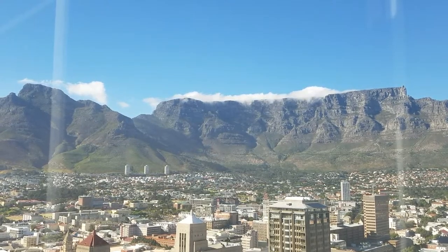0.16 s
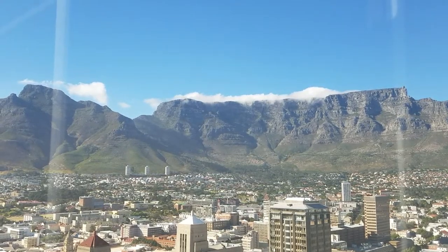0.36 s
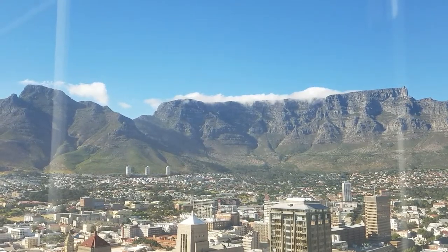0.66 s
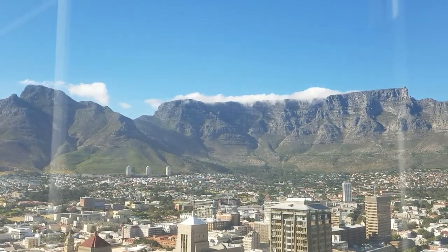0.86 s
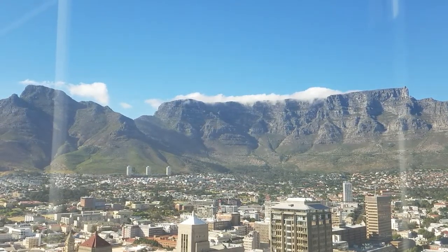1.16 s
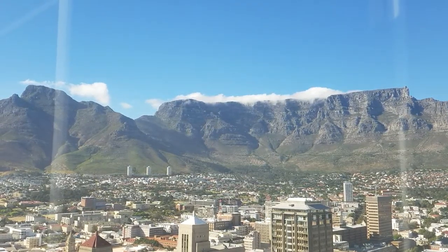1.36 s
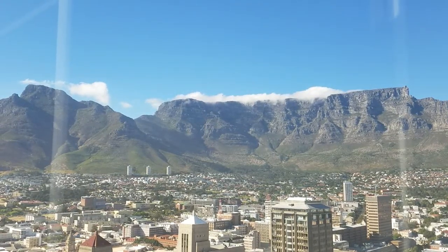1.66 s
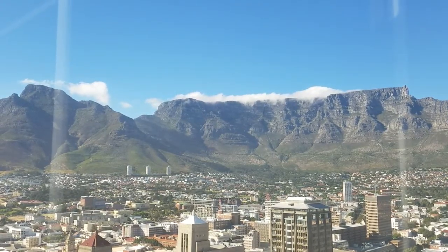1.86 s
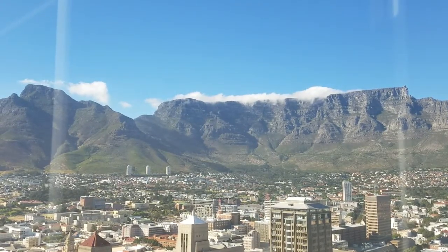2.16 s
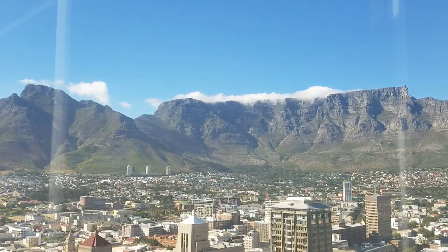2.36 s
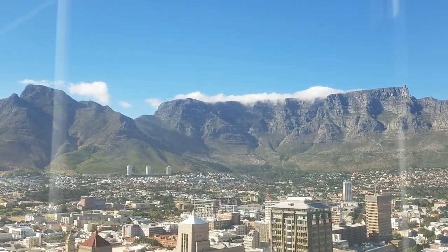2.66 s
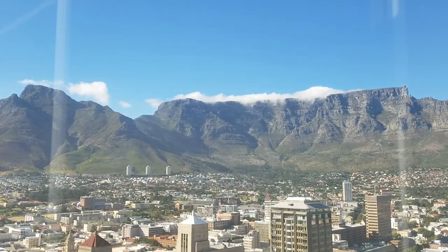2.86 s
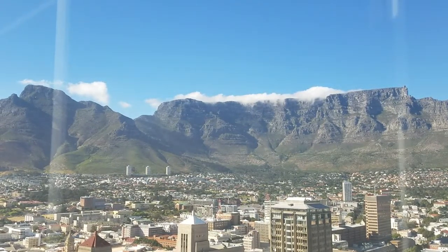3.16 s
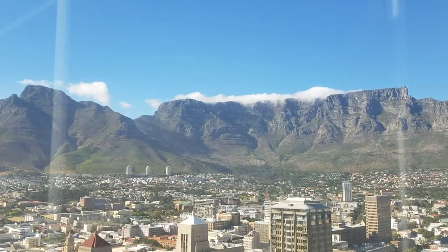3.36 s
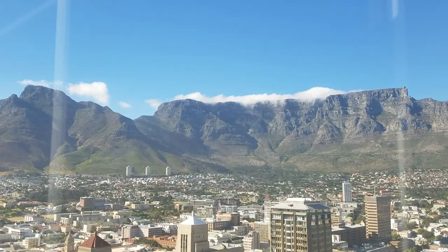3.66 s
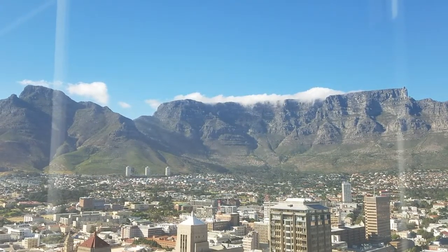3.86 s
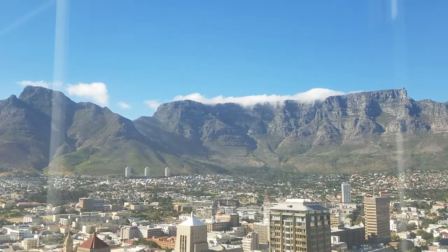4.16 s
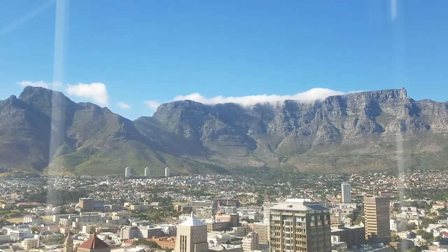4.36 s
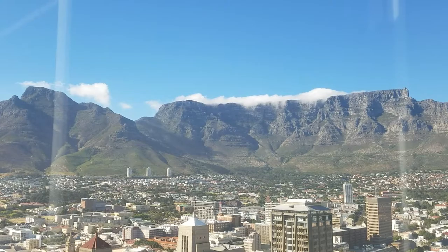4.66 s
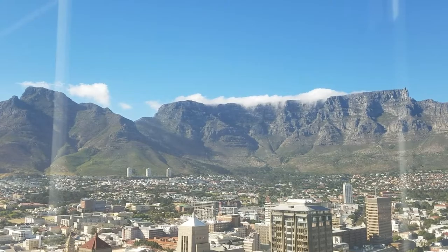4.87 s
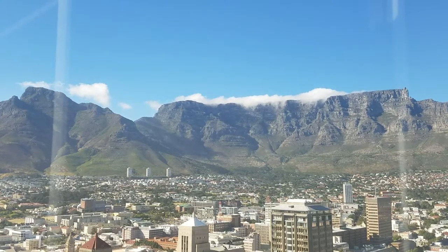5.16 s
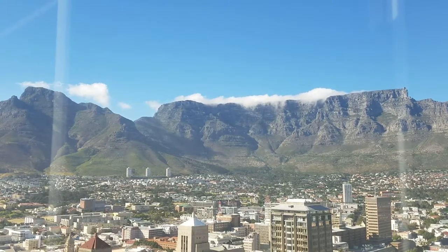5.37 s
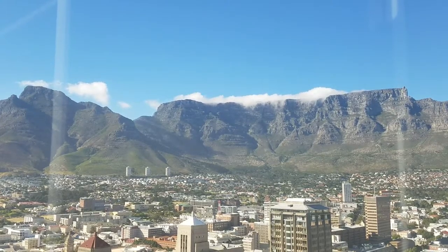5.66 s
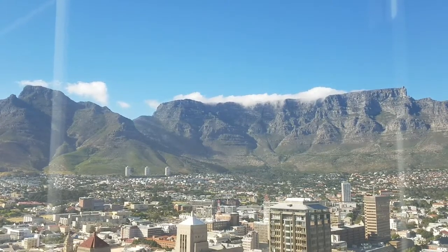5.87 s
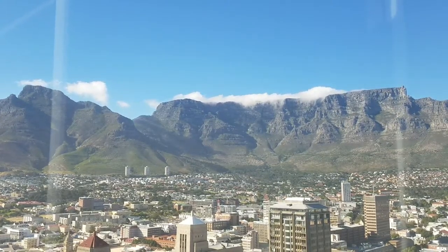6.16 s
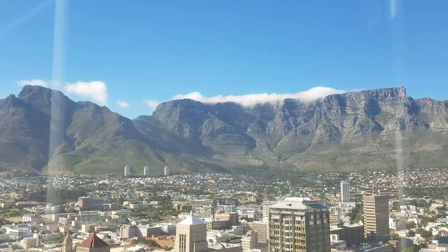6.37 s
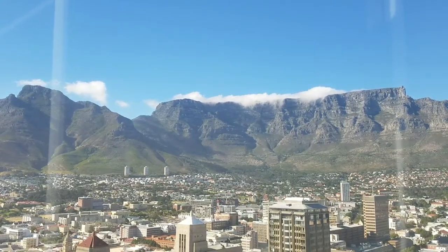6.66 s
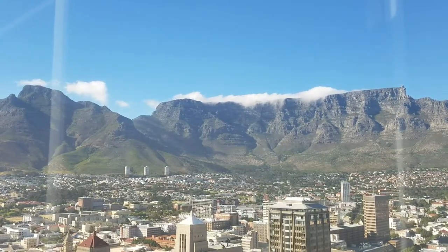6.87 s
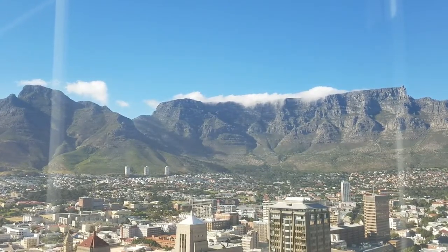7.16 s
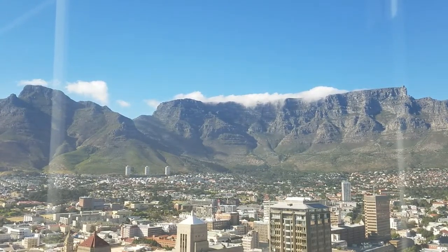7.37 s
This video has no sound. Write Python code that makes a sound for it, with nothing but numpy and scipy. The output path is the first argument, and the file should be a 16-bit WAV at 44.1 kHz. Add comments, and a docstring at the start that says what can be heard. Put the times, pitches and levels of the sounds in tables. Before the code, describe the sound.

Continuous low ventilation drone heard inside a tower room, no city detail. Rumbling air wavers slowly, two fans hum together, one fluttering, and vents rush gently. The hollow moan disappears midway; barely audible breathy whistles come and go. Late, a small hard tick with a quick bounce, a thin whistle, then slightly stronger hiss and a climbing low motor drone. The bass is centred, the upper air wide.

```python
"""A quiet room high in a tower, under a steady ventilation drone.
From the start, noise booms through duct resonances and moans higher up, two fans hum a third apart,
motors add a crowd of faint wavering tones and shaped noise rushes from the vents.
The moan fades midway and faint breathy whistles come and go. Near the end two quick contacts tick,
a thin whistle sets in, then the hiss steps up and a low engine drone rises."""
import sys
import numpy as np
from scipy import signal
from scipy.fft import rfft, irfft, next_fast_len
from scipy.io import wavfile
from scipy.ndimage import uniform_filter1d

SR = 44100
rng = np.random.default_rng(int(sys.argv[2]) if len(sys.argv) > 2 else 0)


def transcribe(signal):
    """Save signal, clipped to [-1, 1], as a 16-bit WAV file at the path in sys.argv[1]."""
    frames = np.atleast_2d(signal).T
    limited = np.clip(frames, -1, 1)
    pcm = np.round(limited * 32767).astype(np.int16)
    wavfile.write(sys.argv[1], SR, pcm)


N = 331448
T = np.arange(N) / SR
BINS_HZ = np.maximum(np.fft.rfftfreq(next_fast_len(N), 1 / SR), 1)


def from_db(db):
    """Decibels to gain."""
    return 10 ** (np.asarray(db) / 20)


def rms_one(x):
    """Scale to unit power."""
    return x / np.sqrt(np.mean(np.abs(x) ** 2) + 1e-30)


def in_time(rows):
    """Each column of a curve at every sample."""
    seconds, *columns = np.transpose(rows)
    return [np.interp(T, seconds, column) for column in columns]


def over_hz(points):
    """A spectrum at every frequency, joined on a log axis and held flat beyond its ends."""
    hz, value = np.transpose(points)
    return np.interp(np.log(BINS_HZ), np.log(hz), value)


def panned(db):
    """Left and right gains for a left-minus-right level difference."""
    return from_db(np.array([[.5], [-.5]]) * db)


def wander(corner_hz):
    """Low-passed complex noise of unit power: it shifts both the level and the phase of a tone."""
    step = 100   # samples per slow point
    pole = np.exp(-2 * np.pi * corner_hz * step / SR)
    noise = rng.standard_normal((N // step + 1002, 2)) @ [1, 1j]
    slow = signal.lfilter([1], [1, -2 * pole, pole * pole], noise)[1000:]   # drop the filter's start
    return np.interp(np.arange(N) / step, np.arange(len(slow)), rms_one(slow))


def tone(hz, lead, waver, rate):
    """A stereo tone of unit power, part steady and part wavering; the left leads by some radians."""
    swing = rms_one(1 + waver * wander(rate))
    spin = swing * np.exp(2j * np.pi * np.cumsum(hz + np.zeros(N)) / SR)
    return np.sqrt(2) * np.real(spin * np.exp(1j * lead * np.array([[.5], [-.5]])))


# Stereo width of the air noise. Each row: frequency in Hz, side level against mid in dB.
AIR_WIDTH = [(60, -27), (110, -27), (175, -18), (220, -12), (350, -9.5), (550, -8), (660, -3.7),
             (830, -4.5), (1050, 1.8), (1800, 1.2), (2600, 0)]
# Stereo balance of the air noise. Each row: frequency in Hz, left minus right in dB.
AIR_BALANCE = [(60, -0.2), (150, 0.1), (300, 4), (700, -1), (1200, 1.5), (1800, -1.1), (4200, -1.1),
               (6400, -2.5), (9800, 1.2), (15000, 0.5)]


def air(gain):
    """Diffuse stereo noise of the given amplitude per root Hz; the bass is nearly alike on both sides."""
    size = next_fast_len(N)
    mid, side = rfft(rng.standard_normal((2, size)))
    width = from_db(over_hz(AIR_WIDTH))
    both = (mid + width * side * [[1], [-1]]) / np.sqrt(1 + width ** 2)
    return irfft(both * gain * panned(over_hz(AIR_BALANCE)), size)[:, :N] * np.sqrt(SR / 2)


def resonating_air(modes, even_s):
    """Turbulence as noise in steep-sided resonances, evened to unit level over even_s seconds."""
    power = sum(from_db(db) ** 2 / (1 + ((BINS_HZ - hz) / width) ** 2) ** 2 for hz, width, db in modes)
    x = air(np.sqrt(power))
    recent_power = uniform_filter1d(np.mean(x ** 2, axis=0), max(int(even_s * SR), 2))
    return x / np.sqrt(recent_power + 1e-20)


# Resonances of the booming duct air, in a low and a high group, and of the hollow moan above them.
# Each row: centre in Hz, offset in Hz where it is 6 dB down, relative level in dB.
LOW_DUCT = [(62.7, 10.3, -11.5), (82.5, 15, -15), (96.8, 6.8, 0), (111.2, 9.9, -3), (121.5, 5.5, -12)]
HIGH_DUCT = [(164, 8.9, -13), (159.7, 19, -7.5), (173.1, 10.6, 1), (182.5, 5, -3)]
MOAN = [(530.5, 47, 0)]
# Slow swell of the duct air. Each row: time in seconds, low and high group levels in dB before trim.
DUCT_SWELL = [(0, -48, -48.5), (.65, -45.5, -49), (1.2, -50, -49.5), (1.6, -45.5, -53), (2.05, -50, -47.5),
              (2.5, -46, -50.5), (2.8, -46, -50.5), (3.15, -44, -49), (3.7, -47, -52.5), (4.15, -47.5, -51),
              (4.43, -50, -50.5), (4.8, -44, -53), (5.4, -47.5, -49.5), (5.8, -49, -48.5),
              (6.4, -47, -49.5), (6.85, -48.5, -50), (7.2, -45.5, -48), (7.52, -48.5, -52)]
# Course of the moan. Each row: time in seconds, level in dB.
MOAN_LEVEL = [(0, -60.5), (.8, -60), (1.25, -58), (1.6, -57), (2, -59), (3.2, -62), (4, -75), (7.52, -81)]


def ducts(low_trim_db=-0.25, high_trim_db=0.3):
    """Turbulent air booms at random in two groups of duct resonances, and moans in a higher one."""
    low, high = in_time(DUCT_SWELL)
    moan, = in_time(MOAN_LEVEL)
    low_boom = from_db(low + low_trim_db) * resonating_air(LOW_DUCT, even_s=0.24)
    high_boom = from_db(high + high_trim_db) * resonating_air(HIGH_DUCT, even_s=.3)
    return low_boom + high_boom + from_db(moan) * resonating_air(MOAN, even_s=0.26)


FAN_HZ, UPPER_FAN_HZ, SHAFT_HZ = 225.2, 282.6, 10.75
# Slow course of the lower fan's hum. Each row: time in seconds, level in dB before trim and flutter.
FAN_COURSE = [(0, -54.5), (.35, -47), (.55, -58), (.9, -53.5), (1.25, -46.5), (1.5, -55), (2.25, -48.5),
              (2.95, -54), (3.4, -51.5), (3.8, -47.5), (4.25, -51), (4.45, -48), (5.15, -49), (5.4, -53),
              (5.8, -47), (6.9, -51), (7.52, -53)]


def lower_fan(flutter_db=1.95, flutter_corner_hz=5.3, half_order_db=-60):
    """A hum whose level flutters around its slow course, with a softly wavering tone an octave below."""
    course, = in_time(FAN_COURSE)
    level = course + flutter_db * rms_one(np.real(wander(flutter_corner_hz)))
    hum = from_db(level - 0.3) * panned(db=1.5) * tone(FAN_HZ, lead=-0.4, waver=0.1, rate=2.2)
    return hum + from_db(half_order_db) * tone(FAN_HZ / 2, lead=0, waver=.2, rate=1.4)


def upper_fan(level_db=-48.5, wobble_rad=0.3, throb=0.058):
    """An uneven rotor: once a turn the hum's phase rocks and its level throbs a little."""
    turn = np.cos(2 * np.pi * SHAFT_HZ * T)
    pitch = UPPER_FAN_HZ - wobble_rad * SHAFT_HZ * turn
    return from_db(level_db) * (1 + throb * turn) * tone(pitch, lead=0.36, waver=0.18, rate=1.0)


# Lasting tones of fans and motors. Each row: frequency in Hz, level in dB, left minus right in dB,
# left lead in radians, wavering part as a ratio to the steady part.
MOTOR_TONES = [(24.9, -77, 0, 0, .4), (30.3, -72, 0, 0, .3), (100.2, -58, 0, .1, .2),
               (184.4, -63, 1, .2, .6), (199.9, -71, -1, .1, .2), (228.8, -63, 3, -.4, .6),
               (261.1, -66, 9, .4, .3), (300.1, -65, 5, -.1, .3), (314.9, -67, -1, -.4, .5),
               (320, -63, 1, 0, .7), (323, -61, 5, .8, .6), (336.5, -65, 1, -.2, .3),
               (399.7, -75, 0, .1, .4), (449.5, -73, 2, 0, .4), (456.9, -74, 0, 0, .5),
               (523.5, -73, 3, -.1, .7), (549.8, -73, 0, 0, .4), (572.6, -73, 0, 0, .4),
               (600.9, -63, -1, -.7, .6), (607.6, -70, 0, 0, .3), (633.2, -71, 5, 2.9, .2),
               (674.9, -74, 3, 2.2, .3), (749.6, -75, 6, 1.1, .3), (777.2, -66, 0, -.3, .45),
               (786.6, -75, -1, -.2, .3), (809.5, -75, 0, 1.2, .3), (900.4, -69.5, 0, .9, .5),
               (914.5, -72, -1, -.5, .3), (1049.1, -77, 0, -1.9, .2), (1127, -78, 4, 2, .7),
               (1218, -79, 6, 2.8, .3), (1250.3, -75.5, 0, -.3, .5), (1277.9, -78, 3, 1.6, .5),
               (1378.1, -79, 1, -2.9, .4), (1497, -82, 0, 1.5, .6), (1577, -82, 0, 2, .6),
               (1987, -87, 0, 1.5, .6), (2019, -86, 0, 2, .8)]


def motors():
    """Wavering machine tones, each placed between the ears by level and phase as room reflections do."""
    return sum(from_db(db) * panned(pan) * tone(hz, lead, waver, rate=2.07)
               for hz, db, pan, lead, waver in MOTOR_TONES)


# A distant engine note that rises at the end. Each row: time in seconds, pitch in Hz, level in dB.
ENGINE = [(0, 72, -82), (6.8, 69, -91), (7.15, 75.7, -53), (7.4, 83.1, -47), (7.52, 86, -52)]


def drone():
    """A low engine note, as a gliding tone that climbs late as it gathers speed."""
    hz, db = in_time(ENGINE)
    return from_db(db) * tone(hz, lead=0, waver=0.15, rate=4.2)


# A small hard tick and its bounce. Each row: time in seconds, strength in dB.
TICKS = [(6.3489, -49.5), (6.3552, -52.5)]
# What the tick rings with. Each row: frequency in Hz, relative level in dB, 60 dB decay in seconds.
TICK_MODES = [(2470, -6, .02), (2640, -2, .025), (2810, 0, .025), (3020, -2, .02), (3270, -6, .02),
              (3650, -14, .012), (4060, -10, .025), (4190, -11, .02)]


def tick(room_db=0.5, room_t60=.2):
    """Two quick contacts ring a small hard part; the room answers with a short diffuse tail."""
    t = T[:SR // 2]
    ring = np.zeros(len(t))
    for k, (hz, db, decay) in enumerate(TICK_MODES):
        # neighbouring modes start in opposite phase, which softens the attack
        ring += (-1) ** k * from_db(db - 60 * t / decay) * np.sin(2 * np.pi * hz * t)
    clicks = np.zeros(N)
    for s, db in TICKS:
        clicks[int(s * SR)] = from_db(db)
    room = rng.standard_normal((2, len(t))) * from_db(-60 * t / room_t60)
    room *= from_db(room_db) / np.linalg.norm(room, axis=1, keepdims=True)   # tail against direct
    room[:, 0] += 1   # the direct sound
    ringing = signal.fftconvolve(clicks, ring)[None, :N]
    return panned(db=-3.0) * signal.fftconvolve(ringing, room, axes=1)[:, :N]


# Thin air whistles that come and go. Each row: start in seconds, end in seconds, pitch in Hz,
# level in dB when fully in, corner of the random flutter in Hz.
WHISTLES = [(2.25, 3.25, 5785, -93, 25), (5.0, 7.0, 7960, -94, 150), (6.15, 6.42, 6340, -88, 40),
            (6.45, 6.95, 6225, -81.5, 30), (6.903, 7.7, 6225, -81.5, 25)]
# the drift scales complex noise of unit power, of which the pitch takes the real part
WHISTLE_FADE_S, WHISTLE_DRIFT_HZ, WHISTLE_DRIFT_CORNER_HZ = .08, 26, 4.4


def whistle(start, end, hz, db, flutter_corner_hz):
    """A thin, breathy tone: it fades in, drifts in pitch and flutters differently on each side."""
    held = np.clip(np.minimum(T - start, end - T) / WHISTLE_FADE_S, 0, 1)
    pitch = hz + WHISTLE_DRIFT_HZ * np.real(wander(WHISTLE_DRIFT_CORNER_HZ))
    flutter = rms_one(.5 + np.array([wander(flutter_corner_hz), wander(flutter_corner_hz)]))
    sides = np.sqrt(2) * np.real(flutter * np.exp(2j * np.pi * np.cumsum(pitch) / SR))
    return from_db(db) * held * panned(db=-5.0) * sides


def faint_lines(line_db, width_hz, count=170):
    """A gain with many narrow peaks: the crowd of weak motor and panel tones within the rush."""
    power = np.ones(len(BINS_HZ))
    for place, strength in rng.random((count, 2)):
        hz = 350 * 10 ** place   # anywhere in the decade above 350 Hz
        peak = from_db(line_db) ** 2 * strength ** 2
        power += peak / (1 + ((BINS_HZ - hz) / width_hz) ** 2) ** 2
    return np.sqrt(power)


# Spectra of the room air, the vent rush and the late soft hiss, before faint lines and level curves.
# Each row: frequency in Hz, density in dB per Hz.
ROOM_AIR = [(15, -88), (38, -95.5), (55, -79.5), (140, -78), (205, -79), (245, -79), (310, -74.5),
            (365, -83.5), (430, -85), (570, -85.5), (690, -90), (850, -88.5), (1000, -97.5), (4000, -160)]
VENT = [(600, -110), (950, -93), (1100, -91), (1350, -89), (1720, -98), (1900, -99), (2080, -95.5),
        (2450, -101.5), (2850, -103), (3400, -107.5), (4100, -109.5), (5000, -112.5), (7800, -116.5),
        (9000, -124), (16000, -135)]
LATE_HISS = [(1000, -106), (2000, -105), (2350, -92), (2750, -109), (4200, -114), (5200, -109),
             (6500, -115), (7700, -110), (9000, -119), (16000, -114.5)]
# Strength of the vent rush. Each row: time in seconds, gain in dB before trim.
RUSH = [(0, 1.3), (.7, 1.5), (1.4, 1), (2, 0), (3.3, -0.7), (4.7, -.7), (5.6, -1), (7.05, -.8), (7.2, 1.5),
        (7.52, 2)]
# Strength of the late hiss. Each row: time in seconds, gain in dB.
LATE_LEVEL = [(0, -39), (7.05, -35), (7.14, -3), (7.3, -2.5), (7.52, -6)]


def vents(rush_trim_db=-0.5):
    """Shaped noise: steady room air, the brighter rush of the vents and a late soft hiss."""
    rush, = in_time(RUSH)
    late, = in_time(LATE_LEVEL)
    lines = faint_lines(line_db=5.0, width_hz=1.97)
    room_air = air(from_db(over_hz(ROOM_AIR)) * lines)
    vent_rush = from_db(rush + rush_trim_db) * air(from_db(over_hz(VENT)) * lines)
    return room_air + vent_rush + from_db(late) * air(from_db(over_hz(LATE_HISS)))


def scene():
    """Everything that reaches the microphones."""
    machines = lower_fan() + upper_fan() + motors()
    whistles = sum(whistle(*row) for row in WHISTLES)
    return ducts() + machines + drone() + tick() + whistles + vents()


# Self-noise of the microphones. Each row: frequency in Hz, density in dB per Hz.
MIC_HISS = [(7500, -122), (9300, -121.5), (10800, -118), (12500, -112.6), (15500, -110.4)]
CUTOFF_HZ = 15720


def record(dry):
    """The microphones add their own hiss; a steep elliptic low-pass cuts the top."""
    noisy = dry + air(from_db(over_hz(MIC_HISS)))
    top_cut = signal.ellip(12, .1, 70, CUTOFF_HZ, fs=SR, output="sos")   # ripple, stopband in dB
    return signal.sosfilt(top_cut, noisy)


dry = scene()
out = record(dry)
transcribe(out)
```